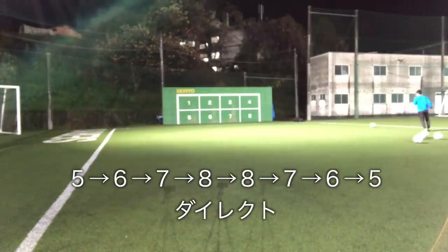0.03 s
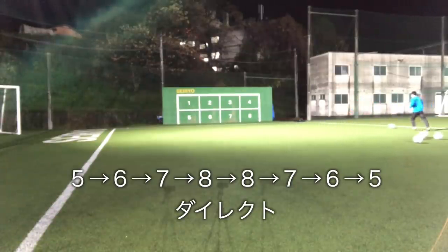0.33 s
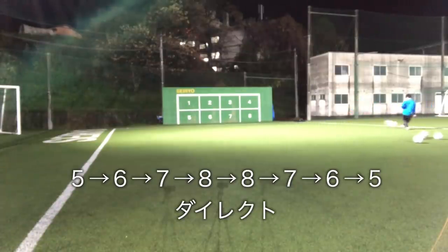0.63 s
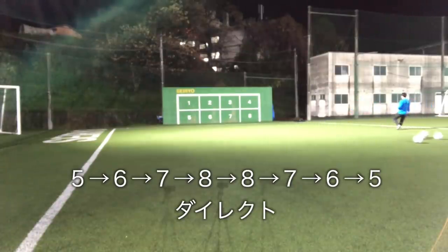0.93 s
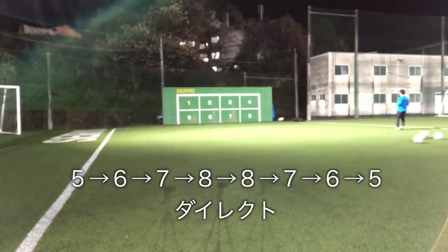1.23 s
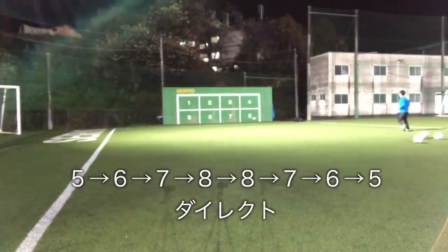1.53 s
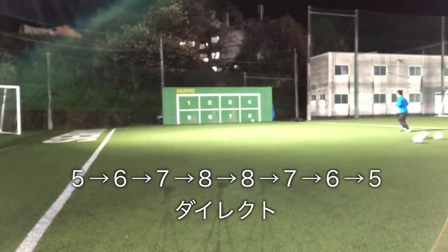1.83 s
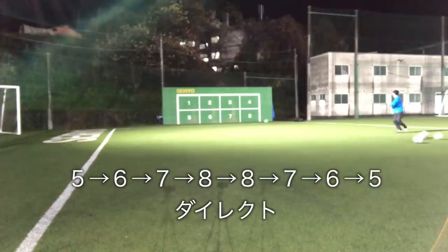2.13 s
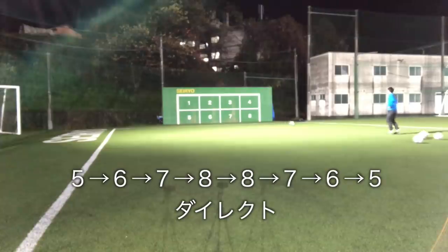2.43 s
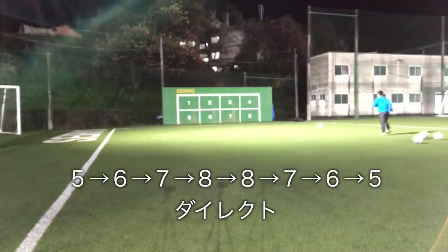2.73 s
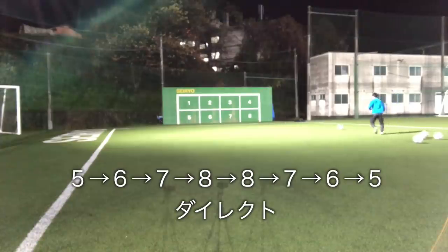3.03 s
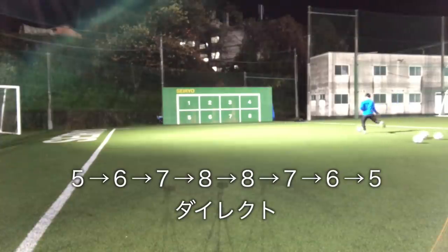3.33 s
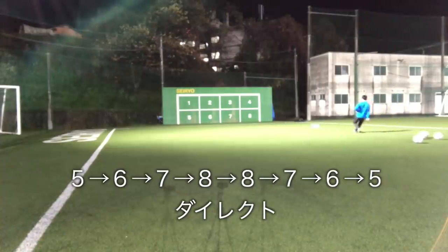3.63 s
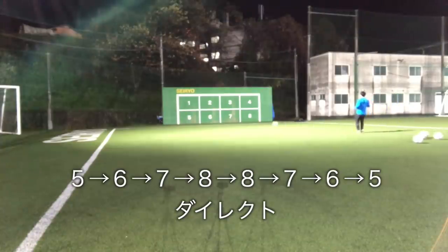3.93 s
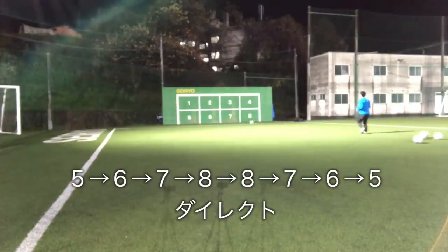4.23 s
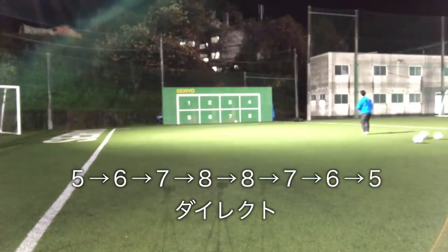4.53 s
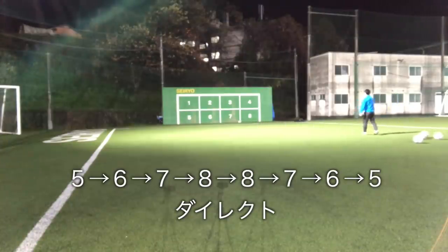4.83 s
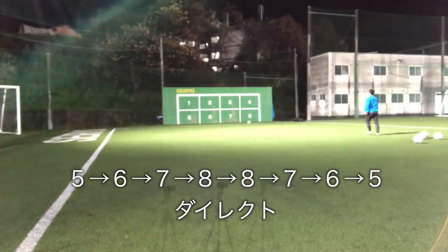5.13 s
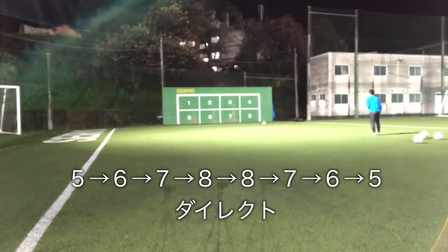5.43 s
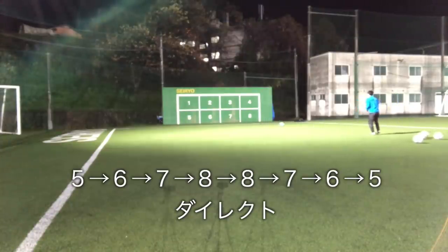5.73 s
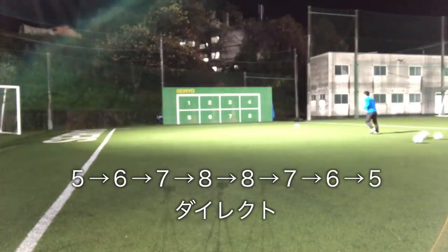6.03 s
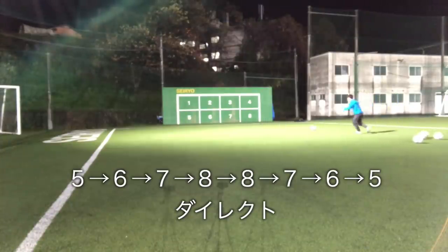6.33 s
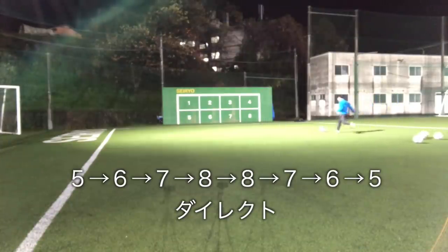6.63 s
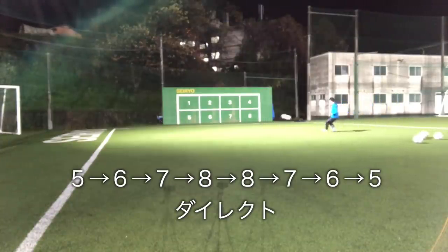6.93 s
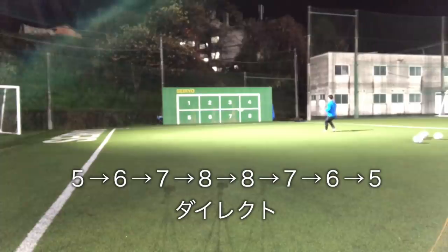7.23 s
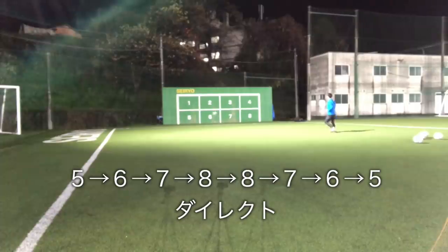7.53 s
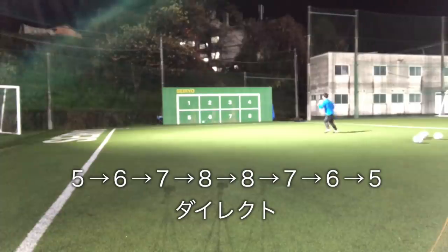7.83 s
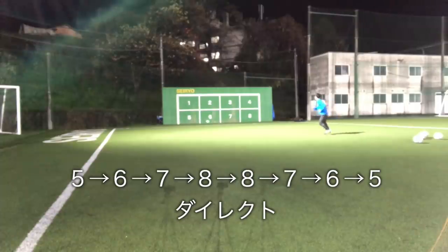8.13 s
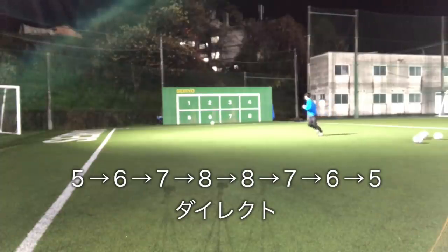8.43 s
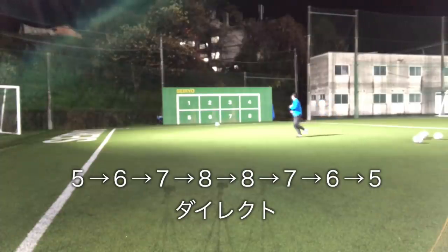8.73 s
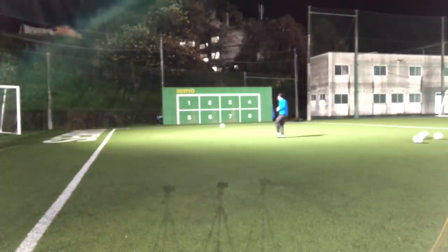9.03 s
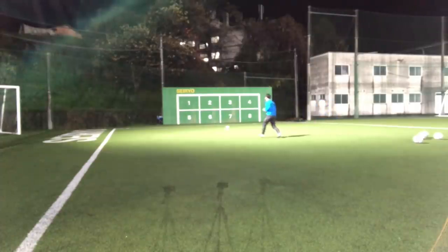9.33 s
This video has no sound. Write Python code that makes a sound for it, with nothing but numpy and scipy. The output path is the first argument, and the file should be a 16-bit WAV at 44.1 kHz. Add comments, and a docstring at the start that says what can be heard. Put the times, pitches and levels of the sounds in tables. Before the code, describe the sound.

Three distant football kicks, each followed by a knock on a target wall and soft bounces, over faint insects and town rumble.

```python
"""Floodlit turf pitch at night, from a distance: a football is kicked three times against a target wall.
Each blow is a skin crack plus a shell thump; porous turf delays the lows, giving a falling chirp.
A wooded bank scatters the crack, fence and posts glint, wall and far buildings return dull echoes.
The rebounding ball bounces softly. Behind it: faint insect-like chirps, low town rumble, thin hiss."""
import sys
import numpy as np
from scipy import signal
from scipy.fft import rfft, irfft
from scipy.io import wavfile

SR = 44100
rng = np.random.default_rng(int(sys.argv[2]) if len(sys.argv) > 2 else 0)


def wav_record(signal):
    """Record a signal, one row per channel, as 16-bit PCM in the file named by sys.argv[1]."""
    frames = np.transpose(np.atleast_2d(signal))
    bounded = np.clip(frames, -1, 1)
    # unit amplitude maps onto the largest positive 16-bit level
    quanta = np.round(bounded * 32767).astype(np.int16)
    wavfile.write(sys.argv[1], SR, quanta)


N = 418509

# boot on ball: start_s, thump_db, contact_s, crack_db, crack_hz, width_ratio, hollow_hz, ring_hz,
# air_db, slap_back_s, slap_back_db, fence_s, far_echo_db
BOOT_KICKS = [(0.6042, 27, 0.0091, 2, 5670, 0.65, 5500, 3600, 2.5, 0.092, -8.5, 0.03, -24.5),
              (3.4440, 30.5, .0090, 2.5, 4120, 1.33, 5500, 3900, 6.5, 0.0950, -11.5, .0308, -21),
              (6.7987, 28.5, .0089, 3, 4770, 1.33, 6250, 4780, -8, .0920, -10, .0275, -28)]
# ball on wall: start_s, thump_db, contact_s, crack_db, crack_hz, width_ratio, hollow_hz, wash_s, wash_db
BOARD_HITS = [(1.716, 27, .0085, 13.5, 4450, 0.81, 7000, 0.023, 0.5),
              (4.6746, 24, 0.0084, -2.5, 4670, 1.6, 4550, 0.023, 3.5),
              (7.8333, 28.5, 0.00844, 13, 3740, 1.17, 4460, .018, -1.5)]
# rebound landing on turf: start_s, thump_db, tick_db
TURF_LANDINGS = [(2.149, -1, -18), (5.154, -5, -29), (8.310, 2.5, -18)]
# lone thuds: start_s, level_db
TURF_THUDS = [(8.093, 2), (8.213, -7), (8.8, -2)]
# light scuffs: start_s, level_db, centre_hz, width_ratio, decay_s
TURF_SCUFFS = [(8.707, -6.5, 1290, .8, 0.0022), (9.033, 4, 740, 0.99, 0.0068)]
# spectrum returned by trees and fence: freq_hz, gain_db
SCATTER_SPECTRUM = [(80, -18), (250, -25), (600, -22), (1200, -10), (2200, -4.5), (4500, -10), (8000, -9.5),
                    (15000, -28)]
# spectrum of the long reverberant roll: freq_hz, gain_db
ROLL_SPECTRUM = [(60, 2), (150, -15.5), (300, -24.5), (700, -30.5), (2000, -34), (5000, -22.5),
                 (15000, -63)]
# insect-like chirps: centre_hz, width_ratio, rate_per_s, decay_s, level_db
INSECT_CHIRPS = [(6900, 0.12, 15, 0.0071, -31), (9940, .22, 14, 0.0023, -38)]
# night air and far town: freq_hz, relative_db
TOWN_SPECTRUM = [(15, -54), (25, -24), (48, -6), (80, 2.5), (120, -0.5), (153, 2), (195, -4.5), (249, -2),
                 (405, -7), (607, -10), (734, -14.5), (911, -12.5), (3340, -23), (9840, -41), (16000, -51)]
# rumble contour: time_s, relative_db
RUMBLE_CONTOUR = [(0.0, -56), (0.63, -53.5), (2.8, -60.5), (3.7, -57), (9.49, -56.5)]
# hiss contour, one list per lull between blows: time_s, relative_db
HISS_CONTOURS = [
    [(0.0, -66), (0.56, -63.5)],
    [(1.1, -64.5), (1.492, -63), (1.66, -62.5)],
    [(2.3, -64.5), (2.632, -64), (3.4, -62.5)],
    [(5.4, -63.5), (6.03, -64.5), (6.7, -63)],
    [(8.4, -63), (8.836, -62), (9.49, -63)],
]

HOP_S, HOP_LOSS_DB = 0.178, 7.5
BOUNCE_ECHO_S, BOUNCE_ECHO_DB = 0.029, 2
POSTS_BEHIND_FENCE_S = 0.035
GLINT_SPACING_S, GLINT_DB, GLINT_FADE_DB_PER_S = 0.019, -23.5, 40
TOWN_DB, HISS_BOOST_DB = -51, 4
CUTOFF_HZ = 15900

# responses are spectra on HZ: product = in series, sum = in parallel
FFT_SIZE = 65536
HZ = np.maximum(np.arange(FFT_SIZE // 2 + 1) * SR / FFT_SIZE, 1e-3)
AGE_S = np.arange(FFT_SIZE) / SR


def kicks():
    """Boot on ball: thump, crack and inner-air ping, then the wall's slap-back and the far echoes."""
    out = np.zeros(N)
    for (start_s, thump_db, contact_s, crack_db, crack_hz, width, hollow_hz, ring_hz,
         air_db, slap_back_s, slap_back_db, fence_s, far_echo_db) in BOOT_KICKS:
        body = from_db(thump_db) * thump(contact_s, release=-0.42, release_hz=860, slap_hz=346,
                                         shell_modes=[(97, 0.79), (151, 0.32)], boom_db=13)
        snap = from_db(crack_db) * crack(crack_hz, width, hollow_hz, hollow_depth=0.65, hollow_width=0.22)
        snap *= kick_skin(ring_hz, air_db)
        # skin ripples and leather drag stretch the click
        ripples = np.prod([1 - 2 * band_pass(hz, 800 / hz) for hz in (3200, 4800, 7000, 10000)], axis=0)
        friction = 0.87 * ripples + 0.5 * spray(0.00057, 0.00088) + 0.18 * spray(0.0026, 0.0087)
        ping = from_db(thump_db - 22.5) * band_pass(1196, 0.35) ** 2 * (1 + 0.77 * delay(contact_s))
        dull = from_db(slap_back_db) * high_pass(66) * low_pass(480, 0.79) * porous_turf(480, 0.46)
        bright = from_db(-12.5) * high_pass(2000) * low_pass(7000, 1.8) * spray(0.00057, 0.0011)
        slap_back = delay(slap_back_s) * (dull + bright)
        far = flutter(first_s=0.160, trip_s=0.111, db=-22.5, loss_db=2.5,
                      dull_hz=664, dulling=0.84, smear_s=0.019, count=5)
        far += building_echo(0.503, db=far_echo_db, dull_hz=293, smear_s=0.012)
        fence = glint(fence_s, db=-19, smear_s=0.0015)
        posts = glint(fence_s + POSTS_BEHIND_FENCE_S, db=-17, smear_s=0.0047)
        space = surroundings(far, fence + posts, bank_s=0.069, bank_db=-2.5,
                             bank_rise_s=0.031, bank_decay_s=0.087, roll_db=4)
        direct = body + ping + snap * friction
        add(out, start_s, direct + (body + ping + snap) * (slap_back + space))
    return out


def wall_hits():
    """Ball on board: it knocks and buzzes; the bank is close, so its wash follows at once."""
    out = np.zeros(N)
    for start_s, thump_db, contact_s, crack_db, crack_hz, width, hollow_hz, wash_s, wash_db in BOARD_HITS:
        body = from_db(thump_db) * thump(contact_s, release=0.97, release_hz=510, slap_hz=306,
                                         shell_modes=[(128, 0.59), (165, 0.41)], boom_db=13)
        knock = 1 + 1.9 * band_pass(582, 0.19) + 0.5 * band_pass(796, 0.14) + 0.48 * band_pass(342, 0.14)
        snap = from_db(crack_db) * crack(crack_hz, width, hollow_hz, hollow_depth=0.38, hollow_width=0.17)
        buzz = from_db(-11.5) * spray(0.00078, 0.017, grain_db=8)
        bank_foot = building_echo(0.015, db=-13.5, dull_hz=300, smear_s=0.0024)
        far = building_echo(0.139, db=-18, dull_hz=225, smear_s=0.0037)
        far += building_echo(0.283, db=-18.5, dull_hz=280, smear_s=0.0071)
        space = surroundings(bank_foot + far, row_of_posts(count=6), bank_s=wash_s, bank_db=wash_db,
                             bank_rise_s=0.00047, bank_decay_s=0.076, roll_db=4.5)
        fence = from_db(wash_db - 12) * high_pass(1600) * delay(wash_s)
        fence *= spray(0.006, 0.0071, grain_db=-5)
        late_wash = from_db(wash_db - 8.5) * band_pass(2600, 0.76) ** 2 * delay(0.05)
        late_wash *= spray(0.03, 0.042, grain_db=2)
        add(out, start_s, (body * knock + snap) * (1 + fence + space) + snap * buzz + late_wash)
    return out


def thump(contact_s, release, release_hz, slap_hz, shell_modes, boom_db):
    """Ball flattens, springs free with a softer pulse; shell modes (centre_hz, width_ratio) boom."""
    pulses = 1 + release * delay(contact_s) * low_pass(release_hz, 2.27)
    slap = pulses * high_pass(365) * low_pass(slap_hz, 1.0) * porous_turf(515, 0.58)
    shell = np.prod([band_pass(hz, width) for hz, width in shell_modes], axis=0)
    boom = from_db(boom_db) * shell * porous_turf(100, 1.5) * delay(0.0035)
    return (slap + boom) * delay(0.0003)


def crack(hz, width, hollow_hz, hollow_depth, hollow_width):
    """Skin snaps flat: one click with a spectral hollow, top softened by the air."""
    hollow = 1 - hollow_depth * band_pass(hollow_hz, hollow_width)
    return band_pass(hz, width) ** 2 * hollow * low_pass(10300, 2.25)


def kick_skin(ring_hz, air_db):
    """Struck skin: low cut, ring, airy top."""
    return high_pass(1870) * (1 + 0.85 * band_pass(ring_hz, 0.24) + from_db(air_db) * band_pass(12300, 0.3))


def turf_touches():
    """Landings with one weaker hop and a wall echo, lone thuds, scuffs; grass blades tick."""
    out = np.zeros(N)
    body = thump(0.015, release=0.15, release_hz=400, slap_hz=230,
                 shell_modes=[(140, 0.29), (180, 0.49)], boom_db=19)
    wall_echo = from_db(BOUNCE_ECHO_DB) * delay(BOUNCE_ECHO_S)
    for start_s, thump_db, tick_db in TURF_LANDINGS:
        for hop in range(2):
            tick = from_db(tick_db) * band_pass(3700, 0.51) ** 2 * spray(0.0013, 0.0062)
            bounce = from_db(thump_db) * body * (1 + wall_echo) + tick
            add(out, start_s + hop * HOP_S, from_db(-hop * HOP_LOSS_DB) * bounce)
    for start_s, level_db in TURF_THUDS:
        add(out, start_s, from_db(level_db) * body)
    blades = from_db(-33) * high_pass(5000)
    for start_s, level_db, centre_hz, width, decay_s in TURF_SCUFFS:
        scuff = (band_pass(centre_hz, width) ** 2 + blades) * spray(decay_s, decay_s)
        add(out, start_s, from_db(level_db) * scuff)
    return out


def porous_turf(hz, width):
    """Path over porous turf: all-pass, lows arrive late."""
    return 1 - 2 * band_pass(hz, width)


def surroundings(echoes, glints, bank_s, bank_db, bank_rise_s, bank_decay_s, roll_db):
    """Dull echoes over turf, fence glints, bright wash off the wooded bank, long low roll."""
    bank = from_db(bank_db) * colour(SCATTER_SPECTRUM, HZ) * delay(bank_s)
    bank *= spray(bank_rise_s, bank_decay_s, grain_db=3)
    roll = from_db(roll_db) * colour(ROLL_SPECTRUM, HZ) * high_pass(169) * spray(0.0075, 0.87)
    return echoes * porous_turf(245, 1.25) + glints * high_pass(1600) + bank + roll


def building_echo(delay_s, db, dull_hz, smear_s):
    """One dull, smeared echo off a building or the foot of the bank."""
    return from_db(db) * delay(delay_s) * low_pass(dull_hz, 1.3) * (0.75 + 0.65 * spray(0.002, smear_s))


def flutter(first_s, trip_s, db, loss_db, dull_hz, dulling, smear_s, count):
    """Sound crossing the pitch to and fro, weaker and duller each trip."""
    return sum(building_echo(first_s + trip * trip_s, db - trip * loss_db,
                             dull_hz / (trip + 1) ** dulling, smear_s) for trip in range(count))


def glint(delay_s, db, smear_s):
    """Short bright return off a post or fence."""
    return from_db(db) * delay(delay_s) * spray(smear_s, smear_s)


def row_of_posts(count):
    """Unevenly spaced posts, each farther and fainter."""
    delays_s = GLINT_SPACING_S * (np.arange(count) + rng.uniform(0.42, 1, count))
    return sum(glint(s, GLINT_DB - GLINT_FADE_DB_PER_S * s, smear_s=0.0019) for s in delays_s)


def insects():
    """Tiny high chirps, random in time and strength."""
    out = np.zeros(N)
    for centre_hz, width, rate_per_s, decay_s, level_db in INSECT_CHIRPS:
        calls = (rng.random(N) < rate_per_s / SR) * from_db(level_db + 3.4 * rng.standard_normal(N))
        chirp = irfft(band_pass(centre_hz, width) ** 2 * spray(decay_s, decay_s))
        out += signal.fftconvolve(calls, chirp)[:N]
    return out


def town():
    """Far traffic rumble under thin hiss, each swelling slowly."""
    hz = np.maximum(np.arange(N // 2 + 1) * SR / N, 1)
    spectrum = rfft(rng.standard_normal(N)) * colour(TOWN_SPECTRUM, hz)
    whole = irfft(spectrum, N)
    rumble = irfft(spectrum / (1 + (hz / 2000) ** 2), N)
    hiss = (whole - rumble) * from_db(HISS_BOOST_DB)
    mix = rumble * swell(RUMBLE_CONTOUR, swing=0.87) + hiss * swell(np.concatenate(HISS_CONTOURS), swing=1.3)
    return from_db(TOWN_DB) * mix / np.std(whole)


def swell(contour, swing):
    """Gain from a contour's deviation about its mean, scaled by swing."""
    db = np.interp(np.arange(N) / SR, *np.transpose(contour))
    return from_db(swing * (db - db.mean()))


def from_db(db):
    """Decibels to gain."""
    return 10 ** (np.asarray(db) / 20)


def colour(spectrum, hz):
    """Gain of a freq_hz, gain_db table at hz."""
    freq_hz, gain_db = np.transpose(spectrum)
    return from_db(np.interp(np.log(hz), np.log(freq_hz), gain_db))


def low_pass(hz, damping):
    """Mass on a spring."""
    s = 1j * HZ / hz
    return 1 / (s * s + damping * s + 1)


def band_pass(hz, width):
    """Resonance, peak gain 1; width = bandwidth / centre."""
    return width * 1j * HZ / hz * low_pass(hz, width)


def high_pass(hz):
    """Second-order bass cut."""
    return (1j * HZ / hz) ** 2 * low_pass(hz, np.sqrt(2))


def delay(delay_s):
    """Pure delay."""
    return np.exp(-2j * np.pi * HZ * delay_s)


def spray(rise_s, decay_s, grain_db=0):
    """Dense uneven arrivals that build and decay; unit energy."""
    sizes = from_db(grain_db * np.repeat(rng.standard_normal(FFT_SIZE // 64), 64))
    envelope = (1 - np.exp(-AGE_S / rise_s)) * np.exp(-AGE_S / decay_s)
    noise = rng.standard_normal(FFT_SIZE) * sizes * envelope
    return rfft(noise / np.sqrt(np.sum(noise ** 2)))


def add(out, start_s, response):
    """Mix a response in at start_s, tail faded."""
    start = round(start_s * SR)
    fade = np.clip(2 - 2 * AGE_S / AGE_S[-1], 0, 1) ** 2
    part = (irfft(response) * fade)[:N - start]
    out[start:start + len(part)] += part


def scene():
    """Whole pitch, mono."""
    return (kicks() + wall_hits() + turf_touches() + town() + insects())[None]


def record(dry):
    """Steep top cut."""
    return signal.sosfilt(signal.ellip(10, 0.1, 80, CUTOFF_HZ, fs=SR, output="sos"), dry)


dry = scene()
out = record(dry)
wav_record(out)
```